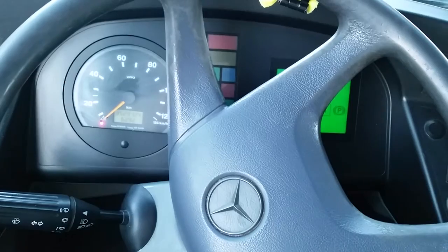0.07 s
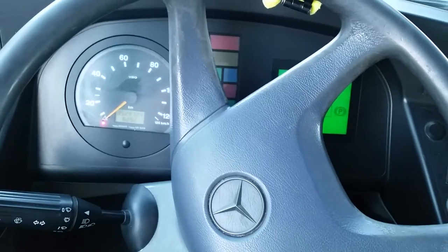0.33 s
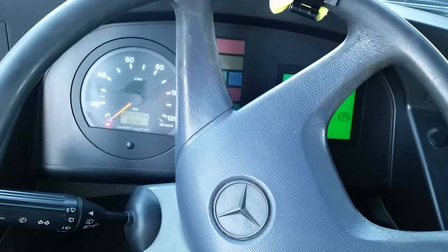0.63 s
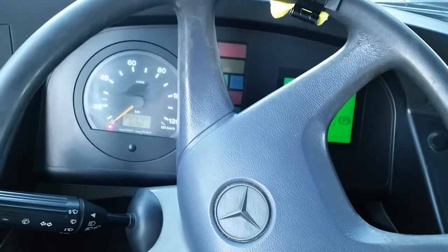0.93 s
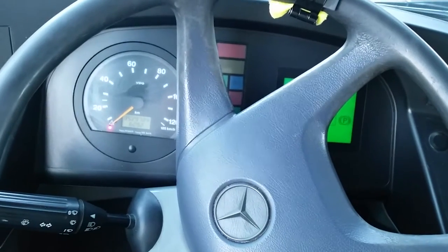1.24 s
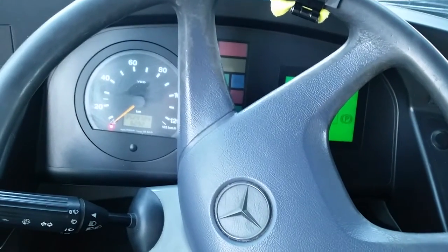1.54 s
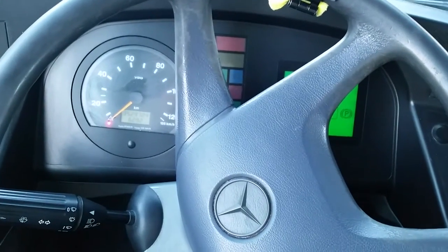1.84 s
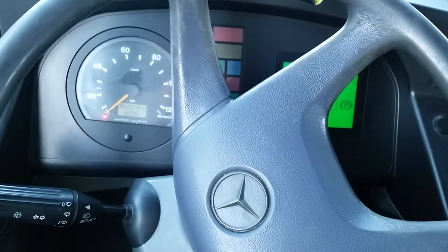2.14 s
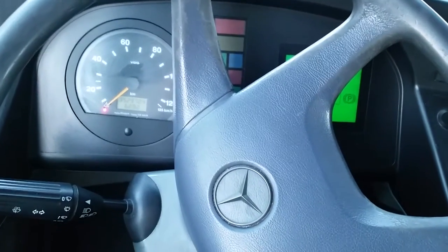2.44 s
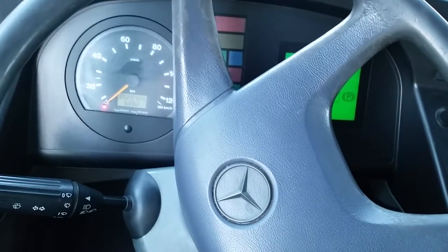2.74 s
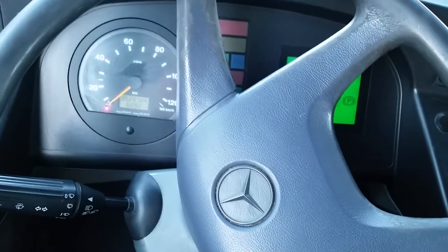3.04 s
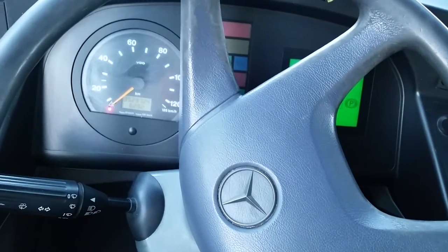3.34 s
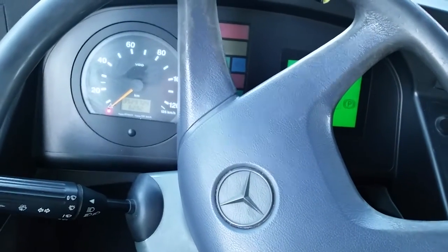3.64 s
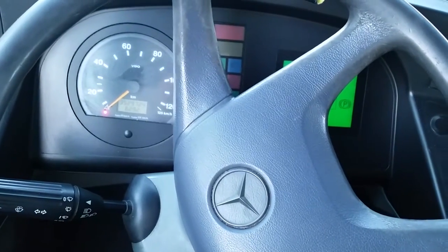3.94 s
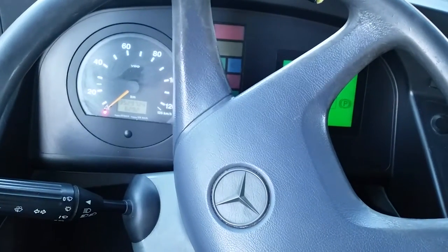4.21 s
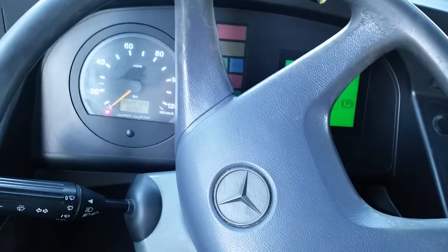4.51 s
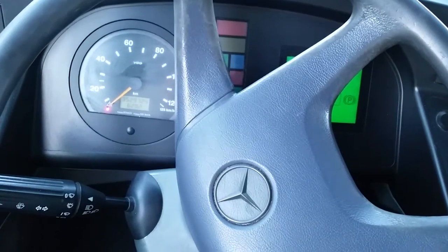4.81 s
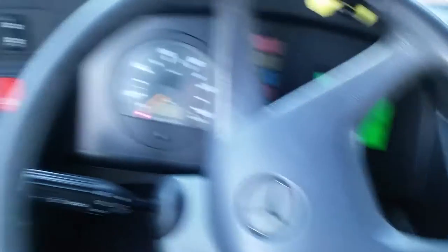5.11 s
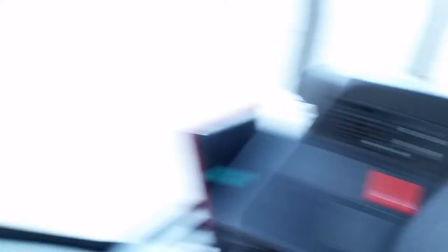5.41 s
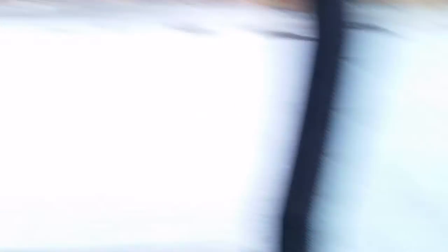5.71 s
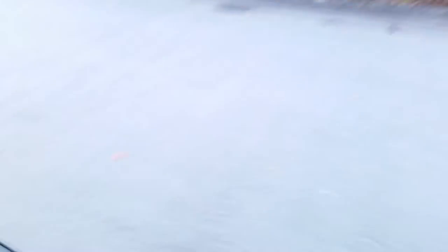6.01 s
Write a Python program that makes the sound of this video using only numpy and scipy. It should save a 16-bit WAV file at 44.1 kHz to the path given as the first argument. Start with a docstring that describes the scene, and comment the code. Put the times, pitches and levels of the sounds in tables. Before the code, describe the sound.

A big diesel bus engine, heard from the driver's seat, revs twice and drops back to idle, with a brief spit of air.

```python
"""Driver's seat of a bus: a six-cylinder diesel revs twice from idle and starts a third rev.
Its firing tone booms in the cab's air modes and its orders sweep the cab resonances. Combustion roar
and clatter, valve-train ticking, turbo whoosh and intake hiss follow speed and throttle.
An air valve spits late in the second rev; a faint, thin high whistle comes and goes at idle.
After 5 s the sound brightens and leans slightly left."""
import sys
import numpy as np
from scipy import signal
from scipy.fft import rfft, irfft
from scipy.io import wavfile
from scipy.ndimage import uniform_filter1d

SR = 44100
rng = np.random.default_rng(int(sys.argv[2]) if len(sys.argv) > 2 else 0)


def inscribe(sig):
    """Save sig as 16-bit PCM at rate SR to the path in sys.argv[1].

    A 1-D sig is mono; a 2-D sig holds one channel per row.
    Samples are clipped to [-1, 1] before scaling.
    """
    pcm = np.round(np.clip(np.atleast_2d(sig).T, -1, 1) * 32767)
    wavfile.write(sys.argv[1], SR, pcm.astype(np.int16))


N = 271656
TIME_S = np.arange(N) / SR
FREQ_HZ = np.fft.rfftfreq(N, 1 / SR)
CYLINDERS, REF_FIRING_HZ = 6, 84
RIGHT_DELAY_S = 0.00033

# Engine speed: time_s, firing_hz
ENGINE_SPEED = [(0,47.3),(.22,61.5),(.45,79.5),(.62,86),(.8,80.6),(1,73),(1.3,60.1),(1.7,48.8),(2.1,38.1),(2.32,35.6),(2.68,60.1),(2.85,73.7),(3.12,83.2),(3.75,83.4),(3.95,78.6),(4.3,61.6),(5.1,41.2),(5.7,30.7),(5.98,32.2),(6.16,44)]
# Throttle: time_s, opening_frac
THROTTLE_CURVE = [(0, 0.64), (.42, 0.85), (.62, .66), (.9, 0.04), (1.5, 0), (2.28, 0), (2.45, 0.56),
                  (2.85, 0.83), (3.1, 0.62), (3.75, 0.56), (4.1, .12), (5.55, 0), (5.9, 0.26), (6.16, 0.62)]
# Layer levels, rows as unpacked in scene():
# base_db, speed_db_per_octave, full_throttle_db, late_shift_db, lag_s
LAYER_LEVELS = [(-11, -0.5, 11, -2.5, 0), (-23.5, 9, 2.5, 0, 0), (-35, 3, 2, 1, 0),
                (-41.5, 2.5, 5.5, 2.1, 0), (-52, 5.5, 12, 4, 0.012), (-51, 6, 2, 2.5, 0.045),
                (-61, 10.5, 7, 2.5, 0.023), (-54.5, 10.5, 2, 6.5, 0.06)]
# Strong engine orders: cycle_multiple, level_db
STRONG_ORDERS = [(9, -7), (11, -11), (12, -3), (13, -6), (14, -11), (15, -12), (16, -6), (18, 1.5),
                 (25, -8), (27, 0), (28, -1), (33, -6)]
# Cab response to the orders: freq_hz, gain_db
CAB_RESPONSE = [(30, -4), (48, -10.5), (72, 3.5), (88, -10.5), (104, -14), (135, -6), (160, -11), (174, -5),
                (190, -13.5), (232, -12), (250, -23.5), (280, -22.5), (325, -29.5), (375, -21), (430, -21),
                (550, -42), (900, -24)]
# Lowest air modes of the cab: freq_hz, gain_db
CAB_AIR_MODES = [(29, -20), (33, -19), (36, -8), (43, -12), (52, -7.5), (62, 1), (72, -2.5), (84, -8.5),
                 (98, -11), (125, -33)]
# Bus body modes: freq_hz, width_hz, level_db
BODY_MODES = [(22.6, 6, -40), (51, 36, -34.5), (70.7, 3.3, -34.5), (81.2, 5.4, -36)]
# Block and cover modes: freq_hz, width_hz, lift_db
BLOCK_MODES = [(773, 41, 1), (916, 21, 4), (1130, 22, 8), (1613, 67, -1), (1872, 11, 10), (2020, 43, 6.5),
               (2165, 47, 6), (2423, 19, 3)]
# Thin whistles at idle: start_s, length_s, level_db
THIN_WHISTLES = [(2.33, 0.21, -77), (5.73, 0.088, -74), (5.89, 0.3, -70)]
# Air valve puffs: start_s, hiss_db, chuff_db, rise_s, decay_s
VALVE_PUFFS = [(3.79, -49, -63, 0.011, 0.031), (3.843, -31, -48, 0.00092, 0.0022),
               (3.846, -40, -41, 0.0054, 0.021), (3.8706, -29.5, -40, 0.0011, 0.00074),
               (3.867, -43, -36, 0.012, 0.027), (3.975, -47, -49, 0.01, 0.043),
               (3.996, -45, -42.5, 0.012, 0.023), (4.66, -58, -52, 0.015, 0.031),
               (6.04, -47.5, -54, 0.023, 0.12)]

# Noise spectra by source: freq_hz, relative_db
DRONE_SPECTRUM = [(80, -59), (110, -1), (150, -3.5), (175, 7.5), (200, 2), (235, 1), (280, -7), (320, -9.5),
                  (365, -4), (450, -16), (600, -33)]
HOLLOW_SPECTRUM = [(740, -15), (830, 0), (930, -3), (1050, -12)]
WHISTLE_SPECTRUM = [(6350, -30), (6680, -3), (6900, -5), (7150, -14)]
INTAKE_SPECTRUM = [(5000, -13), (7000, -16), (9700, -19.5), (11000, -11.5), (11900, -5.5), (12800, -3.5),
                   (14000, -7), (15700, -8.5)]
TURBO_SPECTRUM = [(4000, 2), (5300, 1), (6500, -16), (7300, -3.5), (8100, 1.5), (9000, -3.5), (10500, -6),
                  (12000, -22)]
TICK_SPECTRUM = [(1800, -19), (2600, 4.5), (2900, 1), (3300, 4), (3650, -0.5), (4250, -5), (4800, -12.5),
                 (5300, -18.5), (6000, -40), (7000, -45.5), (9000, -39.5)]
PUFF_SPECTRUM = [(9000, -18), (10700, -5), (11900, 8), (12900, 11), (14000, 2), (15700, 2)]
CHUFF_SPECTRUM = [(1000, -17), (1450, -2.5), (1680, 5.5), (2000, -4.5), (3100, 0), (4200, -6.5),
                  (5500, -13.5), (8000, -16.5), (10500, -21)]
ROAR_SPECTRUM = [(250, -3.5), (400, 3), (520, 2.5), (650, -1), (780, -0.5), (880, -2.5), (960, -1.5),
                 (1130, -6), (1300, -8), (1800, -13), (3000, -26.5)]
CLATTER_SPECTRUM = [(1000, 1), (1350, -17.5), (1620, 1), (1740, -3.5), (2050, -3), (2260, -3.5), (2440, -1),
                    (2700, -22), (3400, -23.5), (5000, -34)]
BITE_SPECTRUM = [(1780, -7), (1920, -6), (2060, 3), (2170, -2.5), (2300, -34), (3900, -18), (4280, -13.5),
                 (4700, -44)]

# Stereo balance of engine and air valve: freq_hz, left_minus_right_db
ENGINE_BALANCE = [(60, 1.5), (200, 2), (380, 3), (700, 6.5), (1300, 6.5), (2400, 8), (4400, 4.5),
                  (6200, -0.5), (8100, 18.5), (10500, 4), (13000, -3)]
VALVE_BALANCE = [(2400, 6), (4400, -1), (8100, 5), (13000, -11)]
# Left-right coherence in the cab: freq_hz, coherence_frac
CAB_COHERENCE = [(60, 1), (130, 0.77), (250, 0.9), (420, 1), (600, 0.66), (1200, 0.36), (2500, 0.2),
                 (8000, 0.12), (15000, 0.12)]


def amp(db):
    """Decibels to gain."""
    return 10 ** (np.asarray(db) / 20)


def unit_rms(x):
    """Scale to rms 1."""
    return x / np.sqrt(np.mean(x ** 2) + 1e-20)


def ramp(start_s, length_s):
    """Linear rise from 0 to 1."""
    return np.clip((TIME_S - start_s) / length_s, 0, 1)


def lookup(table, hz):
    """Interpolate over log frequency."""
    table_hz, values = np.transpose(table)
    return np.interp(np.log(hz + 1), np.log(table_hz + 1), values)


def colour(spectrum):
    """Gain per bin, with steep skirts past the table ends."""
    nearest_hz = np.clip(FREQ_HZ, spectrum[0][0], spectrum[-1][0])
    octaves_out = abs(np.log2((FREQ_HZ + 1) / (nearest_hz + 1)))
    return amp(lookup(spectrum, FREQ_HZ) - 97 * octaves_out)


def wander(rate_hz):
    """Random drift, rms 1."""
    knots = rng.standard_normal(2000)
    return unit_rms(np.interp(TIME_S * rate_hz, np.arange(len(knots)), knots))


def cab_noise(gain, balance=ENGINE_BALANCE):
    """Partly coherent stereo noise, left leading; mid rms 1."""
    shared, separate = rfft(rng.standard_normal((2, N)))
    coherence = np.clip(lookup(CAB_COHERENCE, FREQ_HZ), 0, 1)
    lag_rad = 2 * np.pi * FREQ_HZ * RIGHT_DELAY_S
    left_gain = amp(lookup(balance, FREQ_HZ))
    right = coherence * shared * np.exp(-1j * lag_rad) + np.sqrt(1 - coherence ** 2) * separate
    sum_gain = np.sqrt(1 + left_gain ** 2 + 2 * left_gain * coherence * np.cos(lag_rad))
    noise = irfft(np.array([left_gain * shared, right]) * gain / sum_gain, N)
    return noise / np.std(noise.mean(0))


def pan_left(mono):
    """Mono to stereo, louder and earlier on the left."""
    tilt = amp(lookup(ENGINE_BALANCE, FREQ_HZ) / 2)
    delay = np.exp(-2j * np.pi * FREQ_HZ * RIGHT_DELAY_S)
    spectrum = rfft(mono)
    return irfft([spectrum * tilt, spectrum / tilt * delay], N)


def block_ringing(ripple_db, spacing_hz):
    """Gain per bin: block modes over the cab's crowded small modes."""
    lift_db = sum(db / (1 + (2 * (FREQ_HZ - hz) / width_hz) ** 2) for hz, width_hz, db in BLOCK_MODES)
    knots = rng.standard_normal(4000)
    ripple = np.interp(FREQ_HZ / spacing_hz, np.arange(len(knots)), knots)
    return amp(lift_db + ripple_db * ripple)


def knocks(cycles, depth, decay_frac, uneven_db):
    """Envelope of one burst per cylinder per cycle; cylinders and strokes vary."""
    strokes = cycles * CYLINDERS
    index, phase = strokes.astype(int), strokes % 1
    cylinder_bias = rng.standard_normal(CYLINDERS)[index % CYLINDERS]
    deviation = np.clip(cylinder_bias + rng.standard_normal(N)[index], -2, 2)
    burst = np.sqrt(np.sin(np.pi * phase) ** 3) * np.exp(-phase / decay_frac)
    return unit_rms(1 + depth * amp(uneven_db * deviation) * burst / burst.max())


def hollow_ring(peak_s, width_s, peak_db):
    """Faint onset of a hollow swell that peaks past the end."""
    swell = np.exp(-((TIME_S - peak_s) / width_s) ** 2)
    return amp(peak_db) * swell * cab_noise(colour(HOLLOW_SPECTRUM))


def thin_whistle():
    """Faint, thin whistle near 6.7 kHz that comes and goes at idle."""
    envelope = sum(amp(db) * np.sqrt(abs(np.sin(np.pi * ramp(start_s, length_s))))
                   for start_s, length_s, db in THIN_WHISTLES)
    return envelope * cab_noise(colour(WHISTLE_SPECTRUM))


def body_rumble():
    """The body shudders steadily in its lowest modes."""
    power = 0
    for hz, width_hz, db in BODY_MODES:
        peak = 1 / (1 + ((FREQ_HZ - hz) / (1.4 * width_hz)) ** 2)
        power += (amp(db) * unit_rms(peak)) ** 2
    return cab_noise(np.sqrt(power)) * np.sqrt(np.mean(power))


def cab_drone(level_db):
    """Low noise filling the cab."""
    return amp(level_db) * cab_noise(colour(DRONE_SPECTRUM))


def intake_hiss(level_db, block):
    """Intake air hisses with a slight flutter."""
    return amp(level_db) * cab_noise(colour(INTAKE_SPECTRUM) * block) * amp(0.5 * wander(rate_hz=54))


def turbo_whoosh(level_db, block, load):
    """Turbo air rushes, louder under load."""
    return amp(level_db - 0.7 + 2.0 * load) * cab_noise(colour(TURBO_SPECTRUM) * block)


def valve_train(level_db, block, cycles):
    """Valve gear ticks at twice the firing rate."""
    noise = amp(level_db) * cab_noise(colour(TICK_SPECTRUM) * block)
    return noise * knocks(2 * cycles, depth=0.16, decay_frac=0.14, uneven_db=-2.5)


def air_valve(chuff_lag_s):
    """Sputtering puffs of compressed air; a duller chuff trails each hiss."""
    hiss_gain, chuff_gain = np.zeros((2, N))
    for start_s, hiss_db, chuff_db, rise_s, decay_s in VALVE_PUFFS:
        flow = ramp(start_s, rise_s) * np.exp(-np.maximum(TIME_S - start_s - rise_s, 0) / decay_s)
        hiss_gain += amp(hiss_db) * flow
        chuff_gain += amp(chuff_db) * np.interp(TIME_S - chuff_lag_s, TIME_S, flow)
    sputter = unit_rms(amp(2.5 * wander(rate_hz=330)))
    hiss = hiss_gain * sputter * cab_noise(colour(PUFF_SPECTRUM), VALVE_BALANCE)
    chuff = chuff_gain * cab_noise(colour(CHUFF_SPECTRUM), VALVE_BALANCE)
    return hiss + chuff


def combustion(roar_db, clatter_db, block, load, firing_pulses):
    """Roar and clatter pulse with each firing; under load the block rings with a hard bite."""
    roar = amp(roar_db) * cab_noise(colour(ROAR_SPECTRUM) * block)
    clatter = amp(clatter_db) * cab_noise(colour(CLATTER_SPECTRUM) * block)
    bite = amp(clatter_db - 3.8) * load * cab_noise(colour(BITE_SPECTRUM))
    return (roar + clatter + bite) * firing_pulses


def engine_orders(firing_hz, cycles, weak_db, waver_frac):
    """Unequal cylinders excite multiples of the cycle rate; each swells at cab resonances."""
    order_db = {order: weak_db for order in range(2, 38) if order != CYLINDERS}
    order_db.update({round(order): db for order, db in STRONG_ORDERS})
    cycle_hz = firing_hz[::64] / CYLINDERS
    tones = np.zeros(N)
    for order, db in sorted(order_db.items()):
        gain = np.interp(TIME_S, TIME_S[::64], amp(db + lookup(CAB_RESPONSE, order * cycle_hz)))
        gain *= 1 + waver_frac * wander(rate_hz=9.6)
        tones += gain * np.cos(2 * np.pi * (order * cycles + rng.random()))
    return tones


def firing_boom(level_db, firing_hz, cycles, throttle):
    """Gas pressure opposes piston inertia: the boom dips at balance. A belt-driven part beats with it."""
    compression, fuel = 0.53, 0.26  # shares of the inertia at REF_FIRING_HZ
    belt_order, throb_depth = 5.397, 0.68
    inertia = (firing_hz / REF_FIRING_HZ) ** 2
    shake = compression + fuel * throttle - inertia
    firing, belt, octave = (np.sqrt(2) * np.cos(2 * np.pi * order * cycles)
                            for order in (CYLINDERS, belt_order, 2 * CYLINDERS))
    throb = firing - throb_depth * inertia * belt
    boom_db = level_db + lookup(CAB_AIR_MODES, firing_hz)
    octave_db = -31.5 + lookup(CAB_AIR_MODES, 2 * firing_hz) + 3.0 * wander(rate_hz=9.9)
    return amp(boom_db) * shake * throb + amp(octave_db) * octave


def layer_levels_db(firing_hz, throttle):
    """Levels track speed and throttle, some lagging; late on, boom drops and noise rises."""
    octaves = np.log2(firing_hz / REF_FIRING_HZ)
    late = ramp(start_s=5.09, length_s=0.36)
    for base_db, db_per_octave, throttle_db, late_db, lag_s in LAYER_LEVELS:
        drive_db = db_per_octave * octaves + throttle_db * throttle
        yield base_db + np.interp(TIME_S - lag_s, TIME_S, drive_db) + late_db * late


def scene():
    """Engine speed times tones and knocks; speed and throttle set their strength."""
    firing_hz = np.interp(TIME_S, *np.transpose(ENGINE_SPEED))
    throttle = np.interp(TIME_S, *np.transpose(THROTTLE_CURVE))
    (boom_db, orders_db, drone_db, roar_db,
     clatter_db, tick_db, turbo_db, intake_db) = layer_levels_db(firing_hz, throttle)
    cycles = np.cumsum(firing_hz) / SR / CYLINDERS
    acceleration = np.maximum(uniform_filter1d(np.gradient(firing_hz), size=SR // 4), 0)
    load = np.sqrt(acceleration / acceleration.max())
    growl_db = 5.5 * load * np.exp(-((firing_hz - 75.3) / 7.3) ** 2)  # pulling through 75 Hz
    block = block_ringing(ripple_db=1.62, spacing_hz=21.75)
    firing_pulses = knocks(cycles, depth=0.24, decay_frac=0.11, uneven_db=2.0)

    tones = firing_boom(boom_db, firing_hz, cycles, throttle)
    tones += amp(orders_db + growl_db) * engine_orders(firing_hz, cycles, weak_db=-14, waver_frac=0.22)
    mix = pan_left(tones) + cab_drone(drone_db + growl_db)
    mix += combustion(roar_db, clatter_db, block, load, firing_pulses)
    mix += valve_train(tick_db, block, cycles)
    mix += turbo_whoosh(turbo_db, block, load)
    mix += intake_hiss(intake_db, block)
    mix += body_rumble()
    mix += hollow_ring(peak_s=6.3, width_s=0.06, peak_db=-42.5)
    mix += thin_whistle()
    mix += air_valve(chuff_lag_s=0.0038)
    tilt = amp(0.5 * ramp(start_s=5.43, length_s=0.23))  # balance moves 1 dB left
    return mix * np.array([tilt, 1 / tilt])


def record(dry):
    """Steep low-pass."""
    cutoff_hz = 15780
    taps = signal.firwin(801, cutoff_hz, window=("kaiser", 9), fs=SR)
    return signal.oaconvolve(dry, taps[None], "same")


dry = scene()
out = record(dry)
inscribe(out)
```